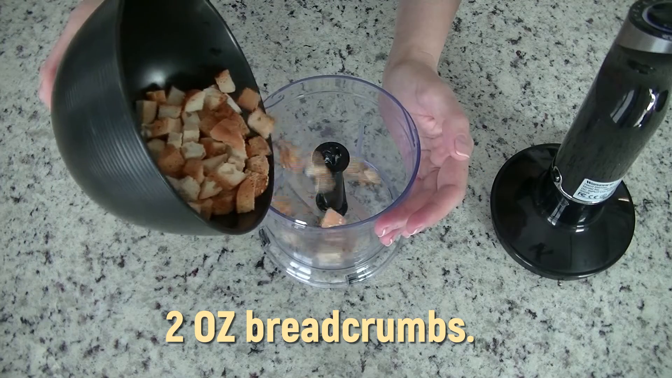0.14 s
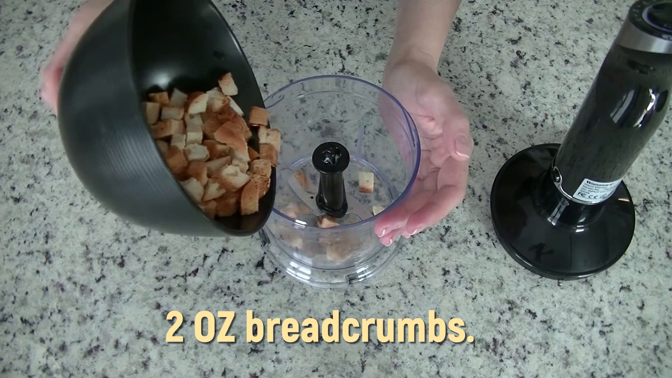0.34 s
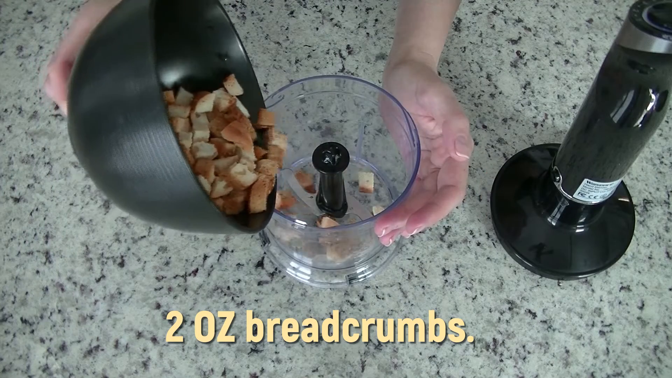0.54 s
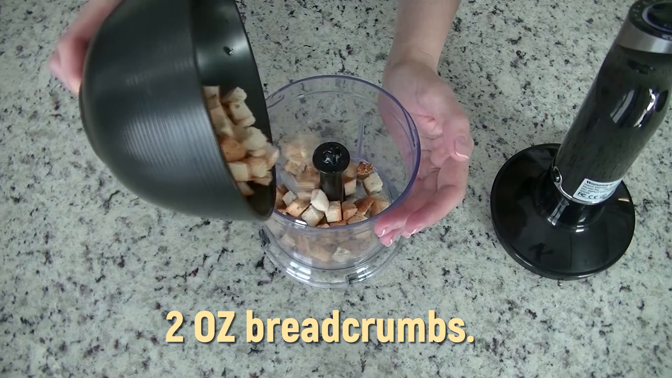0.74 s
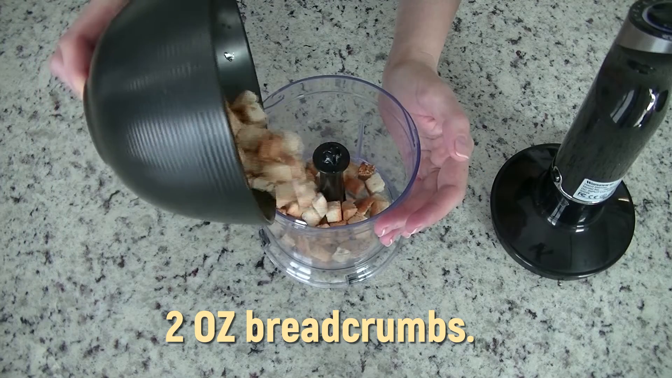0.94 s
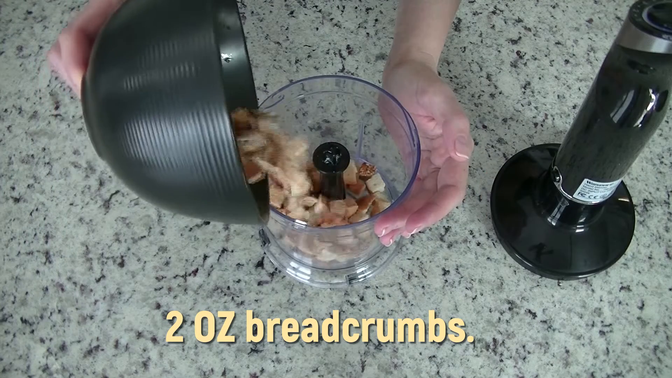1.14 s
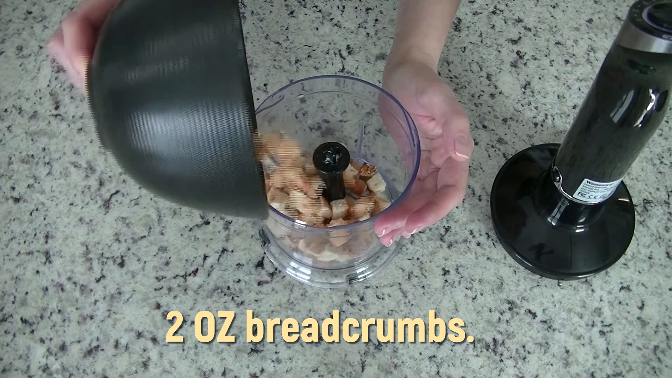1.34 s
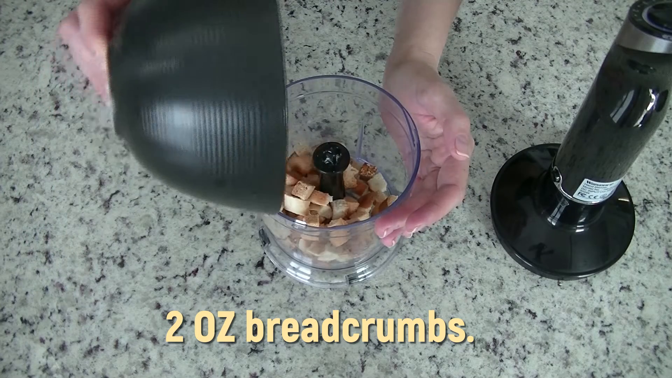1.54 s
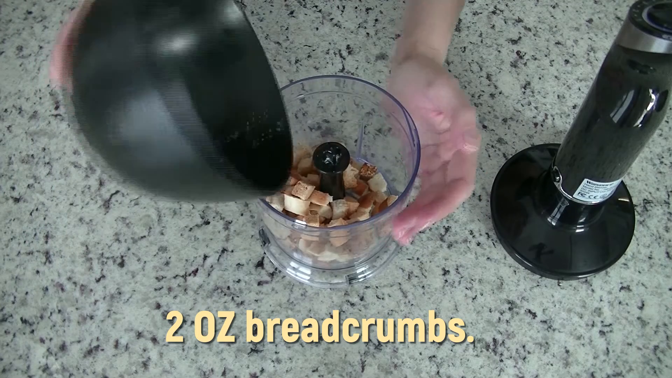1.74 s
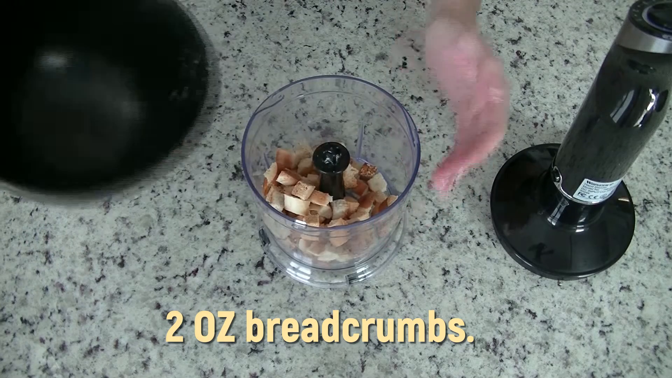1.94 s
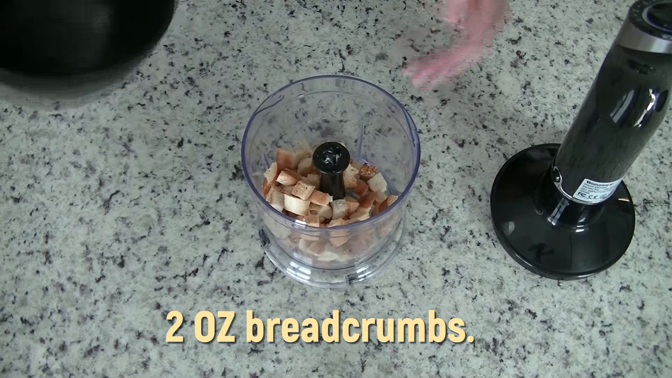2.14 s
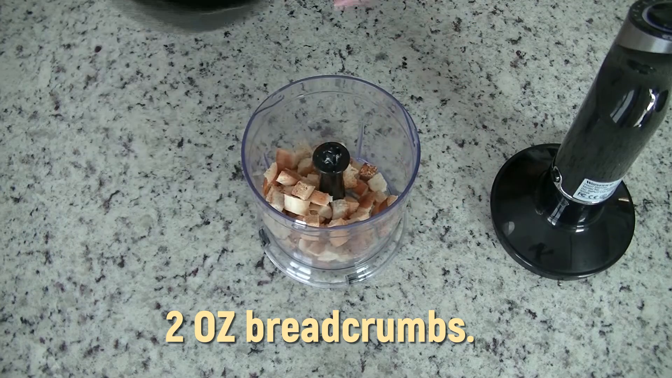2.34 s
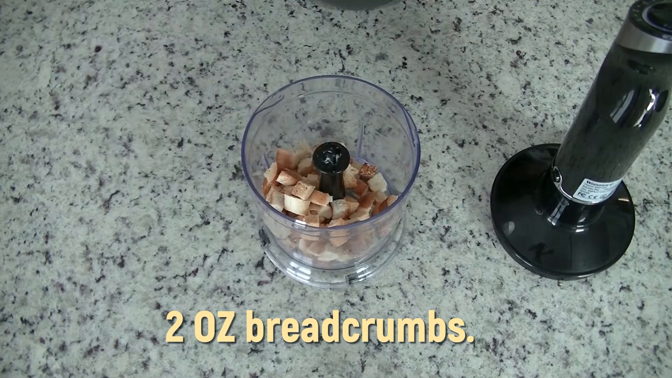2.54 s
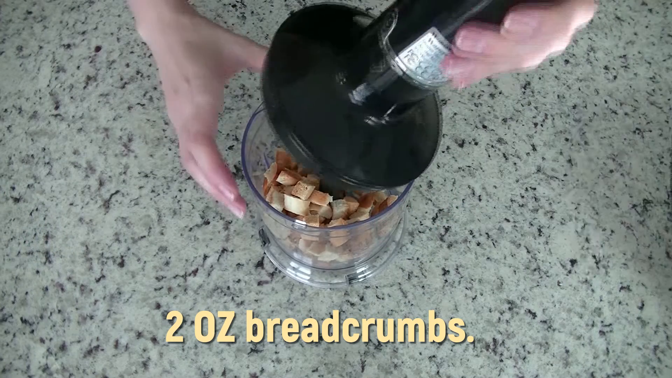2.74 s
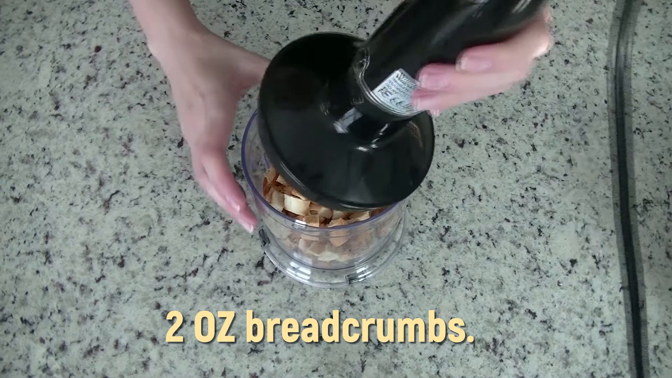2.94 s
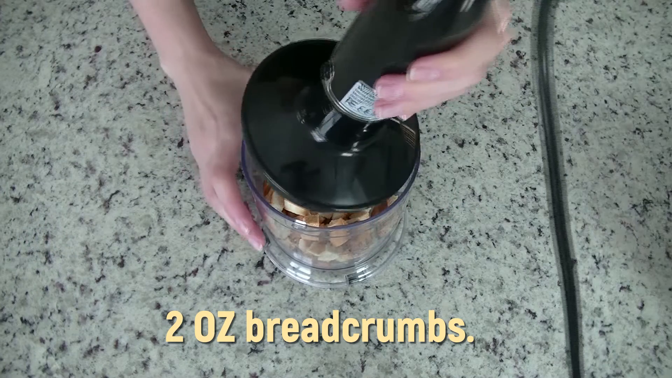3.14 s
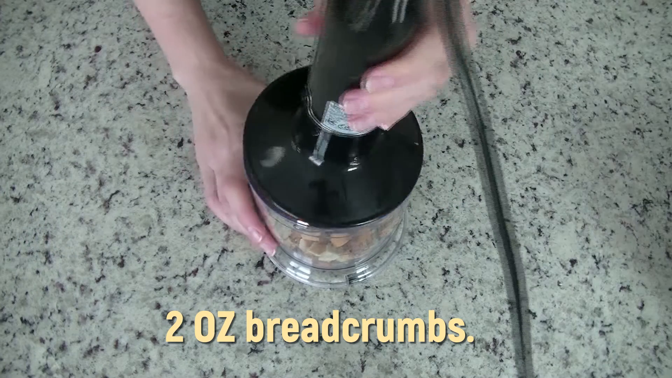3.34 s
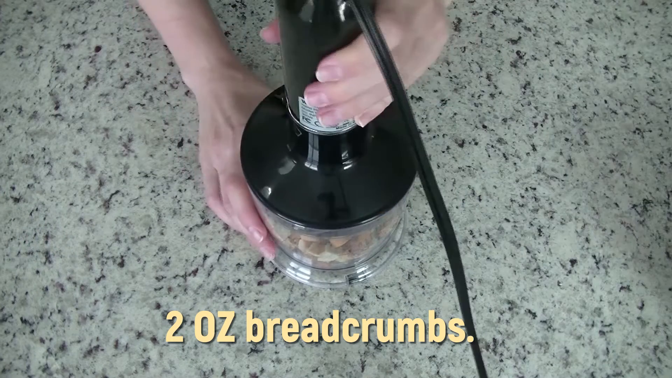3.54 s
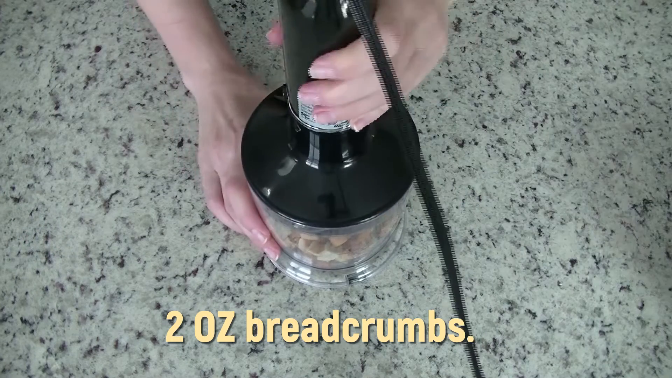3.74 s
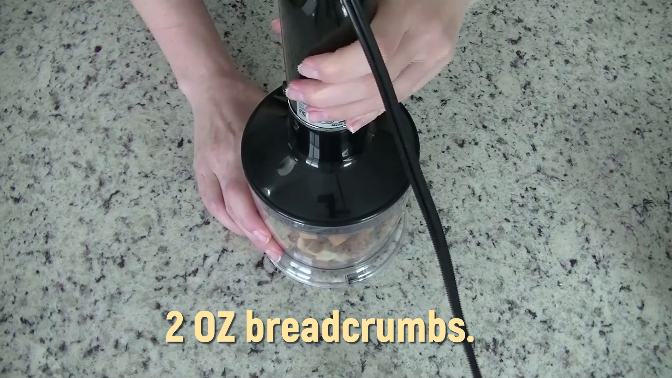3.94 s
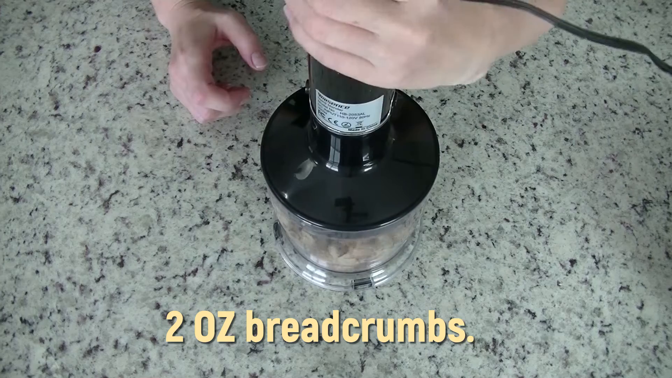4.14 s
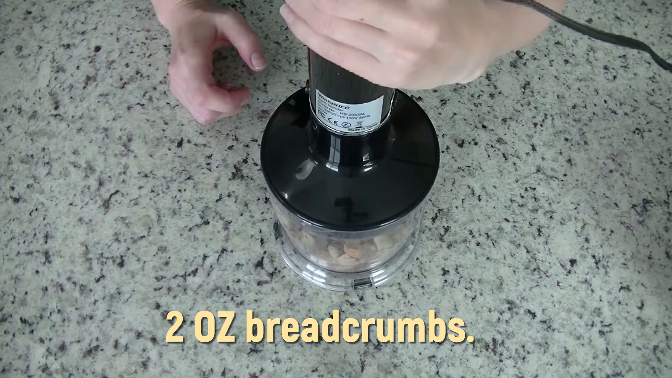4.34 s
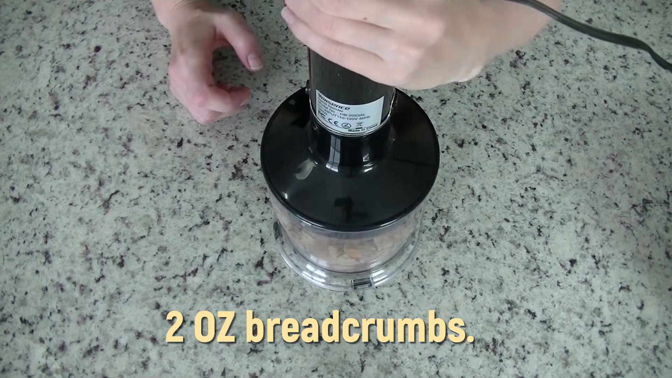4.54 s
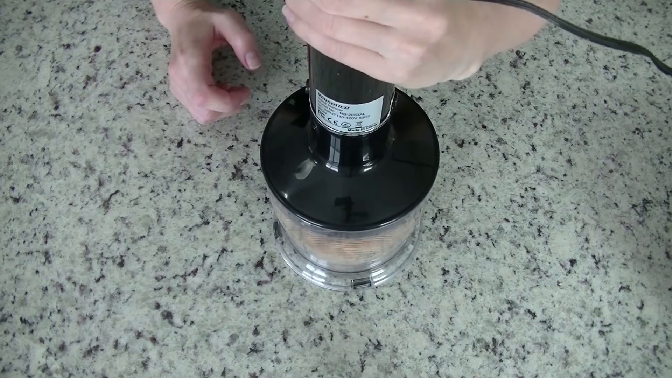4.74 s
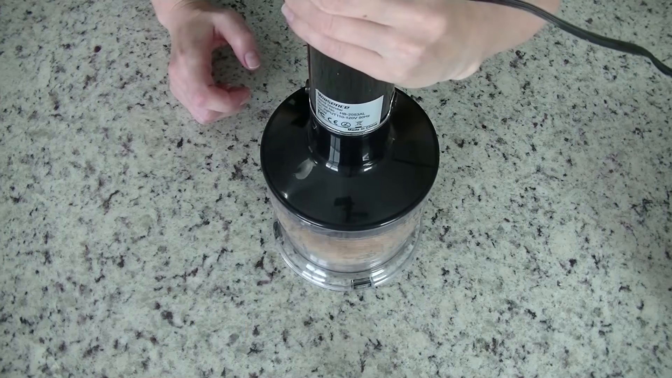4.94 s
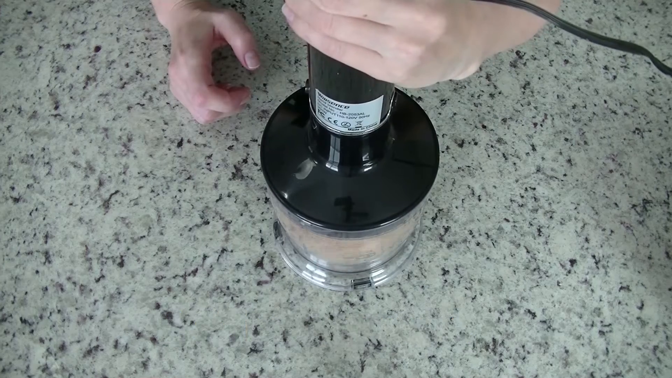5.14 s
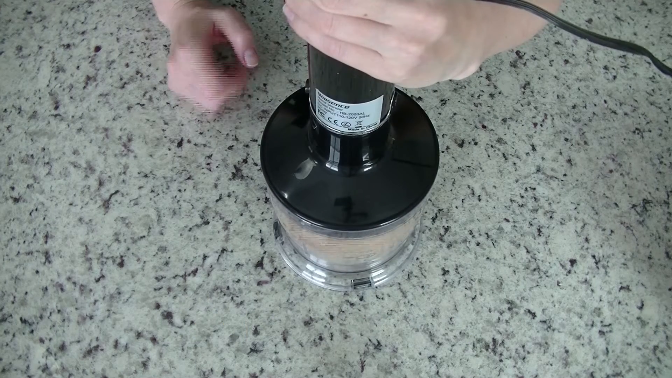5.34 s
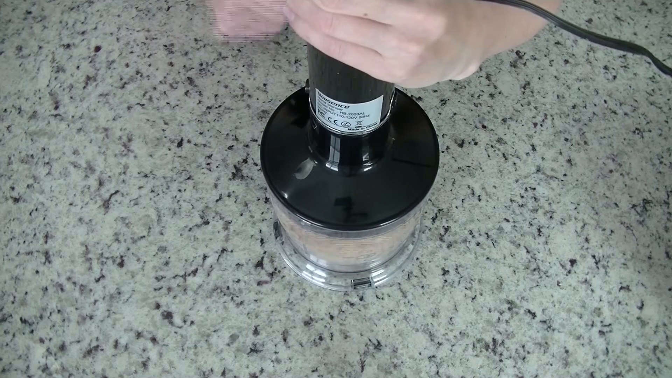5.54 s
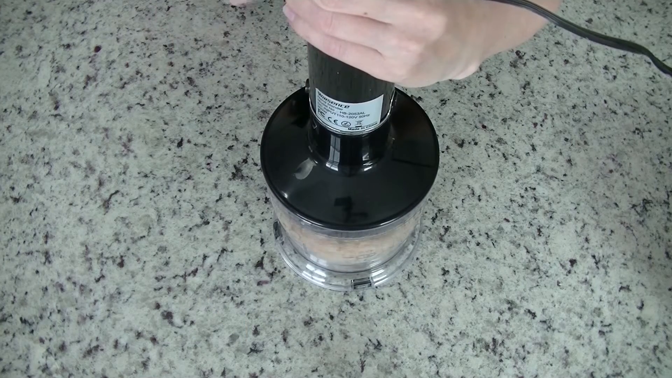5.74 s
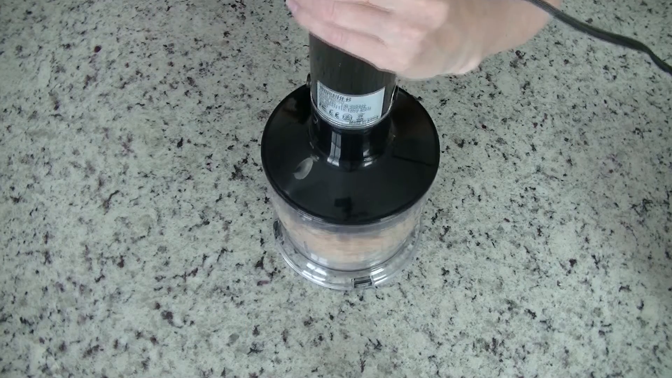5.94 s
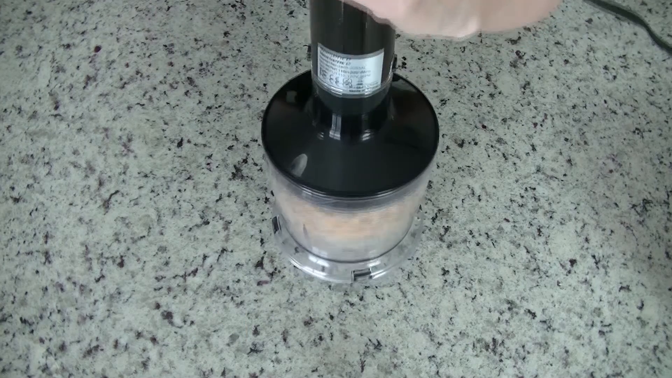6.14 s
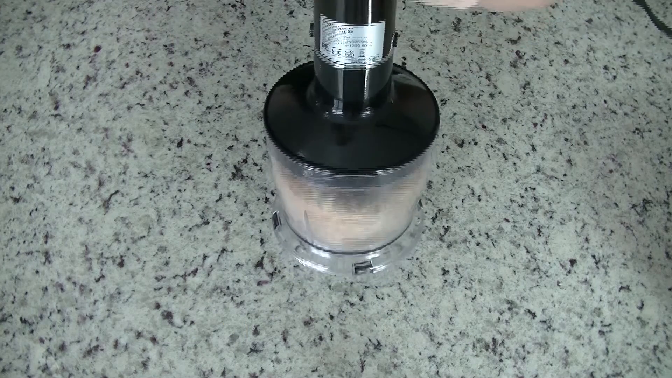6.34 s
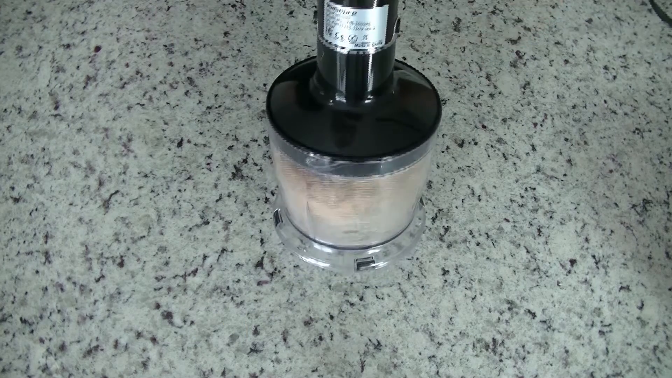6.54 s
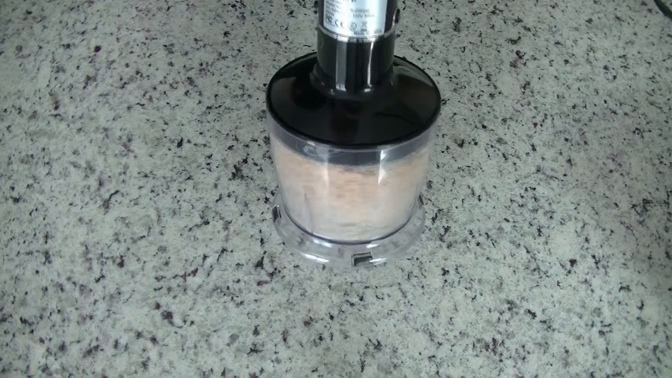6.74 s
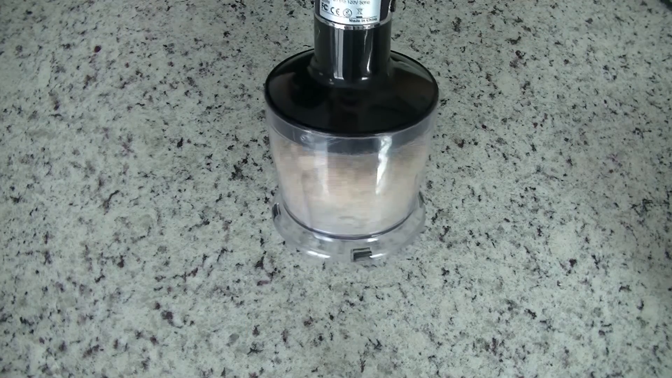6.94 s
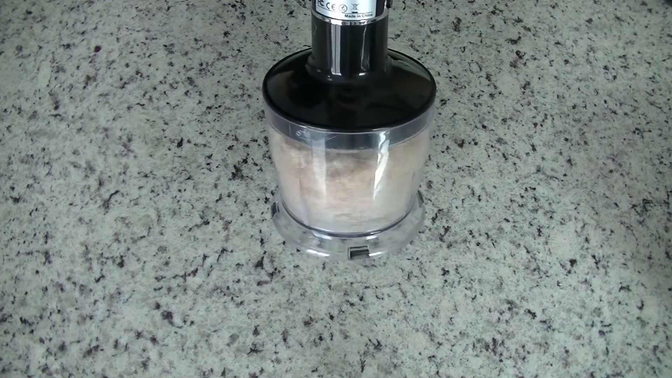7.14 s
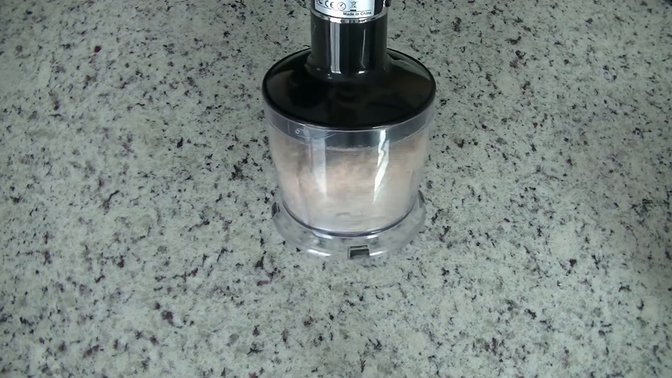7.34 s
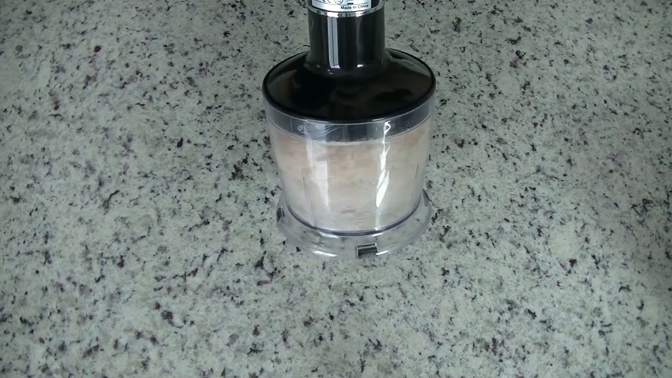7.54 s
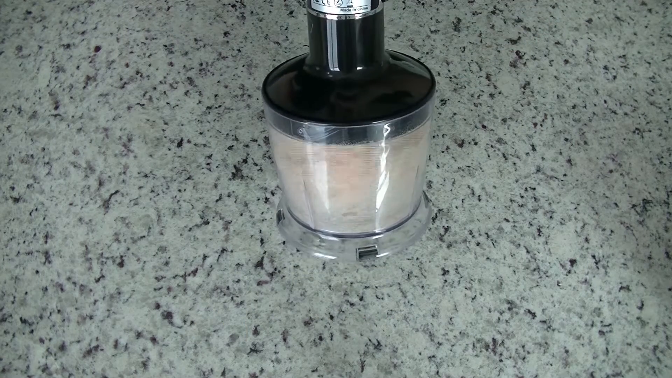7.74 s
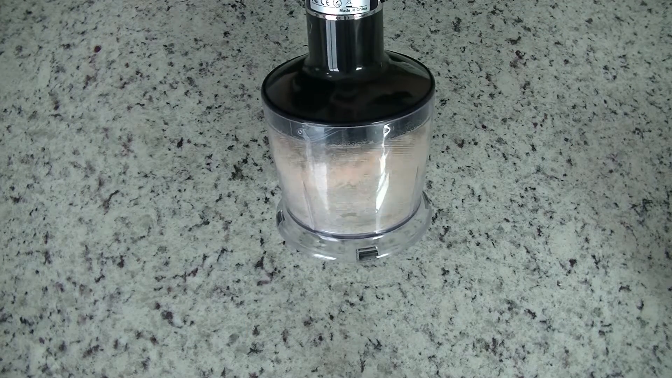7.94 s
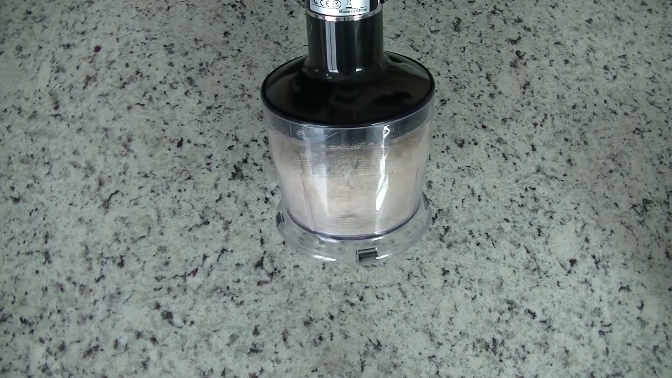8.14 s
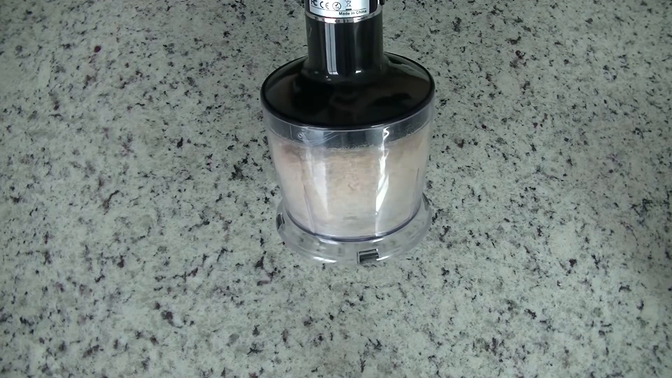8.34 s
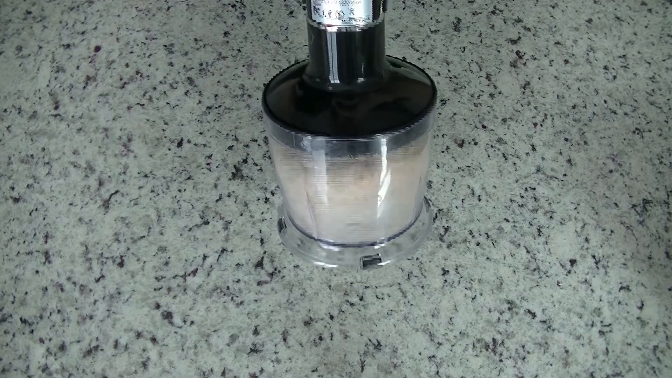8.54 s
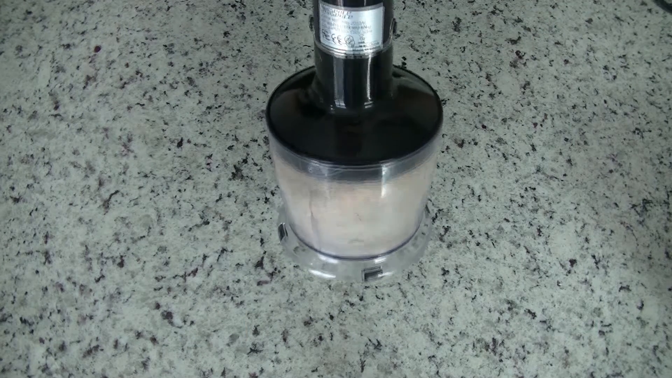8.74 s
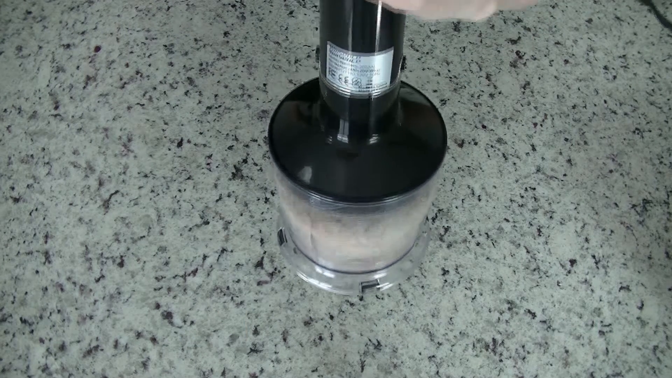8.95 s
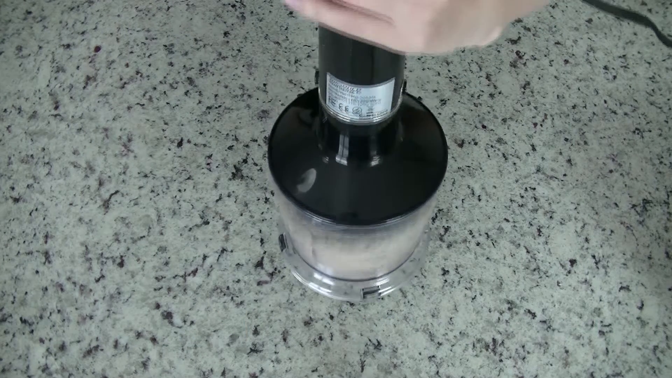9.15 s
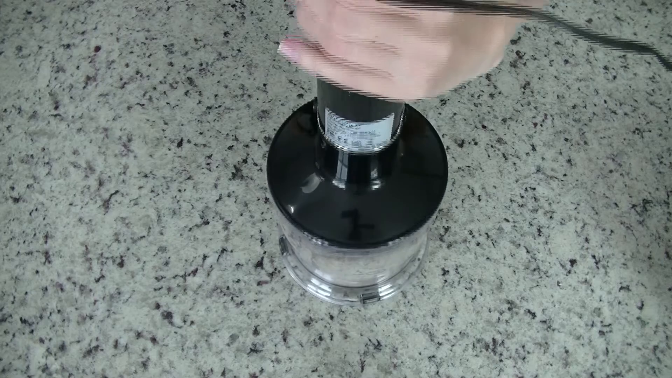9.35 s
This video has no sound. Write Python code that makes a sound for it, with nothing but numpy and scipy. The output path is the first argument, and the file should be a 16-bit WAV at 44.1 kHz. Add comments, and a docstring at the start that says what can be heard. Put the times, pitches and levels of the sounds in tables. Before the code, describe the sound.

Crisp cubes tumble in surges into hard plastic, knocks of a lid follow, and a whirling blade grinds them coarse to fine.

```python
"""A mini chopper's blade flings dry bread cubes round a plastic jar on a stone kitchen counter, two microphones close by.
Random crumbling bursts sound through jar resonances, swelling slightly with each turn, from coarse to hissing crumbs.
Before that the cubes are tipped from a bowl in surges of collisions; lid and motor knock into place as short
ringing bursts, and the cubes give one short rattle. Drive hum, ticks of the camera's focus motor, counter bumps
and steady air noise lie underneath; sparse decaying echoes make the hard kitchen."""
import sys
import numpy as np
from scipy import signal
from scipy.io import wavfile
from scipy.ndimage import uniform_filter1d, minimum_filter1d

SR = 44100
rng = np.random.default_rng(int(sys.argv[2]) if len(sys.argv) > 2 else 0)


def generate_wav(signal):
    """Clip the signal to [-1, 1] and save it as 16-bit WAV at the path in sys.argv[1]."""
    frames = np.transpose(np.atleast_2d(signal))
    scaled = np.clip(frames, -1, 1) * 32767
    pcm = np.round(scaled).astype(np.int16)
    wavfile.write(sys.argv[1], SR, pcm)


N = 414981
TAPS = 4096  # length of a body's response, samples
T, HZ = np.arange(N) / SR, np.fft.rfftfreq(TAPS, 1 / SR)
START_S = 4.612  # the blade starts

# colour of the jar with its floor covered: frequency_hz, level_db
FILLED_JAR = [(71, -63), (120, -34), (569, -17.5), (1050, -24.5), (1370, -20.5), (2480, 0), (3980, 2),
              (7050, -15), (9990, -12), (13900, -24), (16000, -39.5)]


def amp(db):
    """Decibels to gain."""
    return 10 ** (np.asarray(db) / 20)


def evened(x):
    """Scaled to rms 1."""
    return x / np.sqrt(np.mean(x ** 2) + 1e-20)


def read(points, hz=HZ):
    """A spectrum table interpolated on a log-frequency axis."""
    f, value = np.transpose(points)
    return np.interp(np.log(hz + 1), np.log(f + 1), value)


def add(mix, s, sound):
    """Mixes a sound in at time s."""
    part = mix[max(round(s * SR), 0):][:len(sound)]
    part += sound[:len(part)]


def through(x, response):
    """Convolution, cut to the length of x."""
    return signal.oaconvolve(x, response)[:len(x)]


def wander(size):
    """Slow chance of rms 1 that changes over about size samples."""
    smooth = uniform_filter1d(rng.standard_normal(N), size)
    return evened(uniform_filter1d(smooth, size))


def steadied(x, size=3000):
    """Takes the slow swings out of a rattle and leaves its grain."""
    return x / np.sqrt(np.abs(uniform_filter1d(x ** 2, size)) + 1e-9)


def body(colour, modes):
    """Gain in dB of a broad colour with resonances standing on it."""
    return read(colour) + sum(db / (1 + (2 * (HZ - hz) / width) ** 2) for hz, width, db in modes)


def causal(db):
    """The minimum-phase impulse response of a gain in dB: sharp onset, ringing afterwards."""
    log_gain = np.log(amp(np.maximum(db, db.max() - 100)))
    both_sides = np.r_[log_gain, log_gain[-2:0:-1]]
    return np.fft.ifft(np.exp(np.conj(signal.hilbert(both_sides)))).real


def band(hz, width_hz):
    """The response of one steep-sided resonance."""
    return causal(-20 * np.log10(1 + (2 * (HZ - hz) / width_hz) ** 2))


def registers(db):
    """A body's thud, knock, clack and crack: four bands of its response, each of energy 1."""
    # borders between the registers: frequency_hz
    edges_hz = (700, 1900, 6000)
    below = [1 / (1 + (HZ / hz) ** 14) for hz in edges_hz]
    shares = [upper * (1 - lower) for lower, upper in zip([0] + below, below + [1])]
    parts = [causal(db + 10 * np.log10(share + 1e-12)) for share in shares]
    return [p / np.linalg.norm(p) for p in parts]


def rattle(per_s, spread_db, own_db, crumble_s, bed, count):
    """Random collisions as decaying noise bursts; the same ones drive every register, in varying shares."""
    at = np.flatnonzero(rng.random(N) < per_s / SR)
    size_db = spread_db * np.clip(rng.standard_normal(N)[at], -2, 2)
    fade = np.exp(-2 / (crumble_s * SR))
    drives = []
    for _ in range(count):
        power = np.zeros(N)
        power[at] = amp(size_db + own_db * rng.uniform(-0.18, 1, N)[at]) ** 2
        power = signal.lfilter([1], [1, -fade], power)
        level = np.sqrt(power / power.mean() + abs(bed))  # bed: steady noise between collisions
        drives.append(level * rng.standard_normal(N))
    return drives


def patchy(x, depth_db, size):
    """Every fragment has its own pitches: random peaks in the spectrum that last a few milliseconds."""
    z = signal.stft(x, nperseg=size)[2]
    patches = uniform_filter1d(rng.standard_normal(z.shape), size=4, axis=0)
    patches = evened(uniform_filter1d(patches, size=2, axis=1))
    return signal.istft(z * amp(depth_db * np.clip(patches, -2, 2)), nperseg=size)[1][:len(x)]


def morph(drives, gains, stages, weights):
    """Rattles sound the registers of a body whose colour passes through several stages."""
    out = 0
    for k, (drive, gain) in enumerate(zip(drives, gains)):
        blend = sum(w * through(drive, stage[k]) for w, stage in zip(weights, stages))
        out = out + gain * steadied(blend)
    return out


def blows(rows, response, crumble_s, snap, vary_db, gains_db):
    """Single hits: a snap and a crumbling burst of random colour sound a body's registers; treble ends first."""
    # relative lengths of a hit's parts: thud, knock, clack, crack [factors of crumble_s]
    crumble_shares = (1.7, 0.99, 1, 0.64)
    out = np.zeros(N)
    ages = [T[:TAPS] / (crumble_s * abs(share)) for share in crumble_shares]
    fades = [(1 + u) * np.exp(-u) for u in ages]
    for s, *levels_db in rows:
        burst = rng.standard_normal(TAPS)
        burst[0] += snap
        colour = causal(vary_db * evened(uniform_filter1d(rng.standard_normal(len(HZ)), size=60)))
        hit = sum(amp(db + g) * evened(through(through(burst * fade, colour), r))
                  for db, g, r, fade in zip(levels_db, gains_db, response, fades))
        add(out, s, hit)
    return out


def struck(hits, modes):
    """Taps (s, dB) on an object: each mode (Hz, dB, t60 s) is a decaying sine of random phase."""
    out, t = np.zeros(N), T[:SR // 2]
    for s, db in hits:
        ring = sum(amp(db + mode_db - 60 * t / t60) * np.sin(2 * np.pi * (hz * t + rng.random()))
                   for hz, mode_db, t60 in modes)
        add(out, s, ring * np.clip(t / 0.00054, 0, 1))
    return out


def room_air():
    """Steady noise of the room, coloured, with two faint resonances; one noise for mid, another for side."""
    # colour of the air: frequency_hz, level_db
    air_colour = [(12, -44.5), (20, -19.5), (53, -11), (123, -8.5), (158, -3.5), (248, -8.5), (277, -6.5),
                  (422, -9), (459, -10), (780, -12), (1480, -17), (6180, -19), (7310, -17), (8650, -24),
                  (16000, -32.5)]
    # its resonances: frequency_hz, width_hz, lift_db
    air_modes = [(135, 25, 1.7), (7300, 830, 2.6)]
    response = causal(body(air_colour, air_modes))
    return [amp(-58) * evened(through(n, response)) for n in rng.standard_normal((2, N))]


def scatter(seconds):
    """Sparse echoes of random sign."""
    n = int(seconds * SR)
    return rng.choice([-1., 1.], n) * (rng.random(n) < .15)


def tail(x):
    """One path through the room: scattered echoes, each band dying at its own speed."""
    # reverberation of the kitchen: frequency_hz, t60_s
    decay = [(100, 0.24), (300, 0.67), (1000, 0.64), (2500, 0.63), (5000, 0.55), (9000, 0.31),
             (15000, 0.18)]
    hz, t, z = signal.stft(scatter(1) * np.clip(T[:SR] / 0.0049, 0, 1), SR, nperseg=256)
    echoes = signal.istft(z * amp(-60 * t / read(decay, hz)[:, None]), SR, nperseg=256)[1]
    return through(x, echoes / np.linalg.norm(echoes))


def kitchen(x, count=3):
    """The sound feeds several scattered-echo paths in turn, swinging steadily from one to the next."""
    tint = [(100, 0), (300, 2), (600, 1.0), (1000, -1), (2500, -1.5), (5000, 1), (10000, -0.5)]  # Hz, dB
    x = through(x, causal(read(tint)))
    paths = [tail(x * np.cos(np.pi * (4 * T + k / count))) for k in range(count)]
    return sum(paths) * np.sqrt(2 / count)


def focus():
    """Faint, evenly spaced ticks of the camera's focus motor, each a pair of short modes."""
    # two runs of steps: start_s, end_s, level_db
    runs = [(1.971, 2.43, -50), (3.432, 3.89, -50)]
    # ring of one tick: frequency_hz, level_db, t60_s
    tick_modes = [(940, 0, 0.034), (5660, -2.5, 0.053)]
    step_s = .04
    ticks = [(s, db) for start, end, db in runs for s in np.arange(start, end, step_s)]
    return struck(ticks, tick_modes)


def bumps():
    """The jar bumps on the counter: low modes that die quickly."""
    # the bumps: start_s, level_db
    bump_hits = [(3.5, -52.5), (4.606, -56), (7.555, -61)]
    # low modes of a bump: frequency_hz, level_db, t60_s
    bump_modes = [(45, 0, .2), (75, 2, .15), (127, 16, .15)]
    return struck(bump_hits, bump_modes)


def bowl():
    """Some cubes ring the tilted bowl: taps on its modes."""
    # the taps: start_s, level_db
    taps = [(.638, -37), (.675, -41), (.713, -23), (1.01, -25.5), (1.052, -30)]
    # ring of the bowl: frequency_hz, level_db, t60_s
    bowl_modes = [(1740, -2.5, 0.13), (2260, -18, 0.38), (3080, 0.5, 0.11), (3070, -22, 0.63),
                  (4820, -8.5, 0.11), (6700, -12, 0.1), (8866, -14, 0.15)]
    return struck(taps, bowl_modes)


def lid():
    """Plastic knocks on plastic and the lid rings briefly; then the cubes are jolted once and settle."""
    # lid, motor and switch knock into place: start_s, level_db, thud_relative_db, bright_edge_relative_db
    knock_rows = [(3.334, -29.5, -14, 2), (3.3418, -14, -15, -10), (3.468, -17, -21, -23),
                  (3.486, -28, -13, -13), (3.496, -22.5, -6, -10), (3.516, -27.5, -9, -8.5),
                  (3.576, -27.5, -16, -23), (3.653, -30, -14, -26), (3.689, -33.5, -15, -18),
                  (3.752, -37, -17, 1), (3.8, -27.5, -8.5, -10.5), (3.836, -49, -4, -12),
                  (3.9081, -2.5, -18, -15), (4.386, -38, -20, 6), (4.532, -51, -14, 5),
                  (4.6045, -21, -6.5, -7)]
    # colour of the lid: frequency_hz, level_db
    lid_colour = [(40, -36), (110, -14.5), (250, 1), (450, -1.5), (800, -10.5), (1050, -2), (1450, -16),
                  (2400, -13), (4000, -16.5), (7000, -34), (11000, -31), (16000, -54)]
    # its broad resonances: frequency_hz, width_hz, lift_db
    lid_modes = [(335, 96, -1.5), (1720, 160, 6.5), (2390, 110, 6), (3250, 550, 5.5)]
    # the lid's own ring: frequency_hz, level_db, t60_s
    lid_ring = [(1018, 1.5, 0.058), (1164, 3, 0.028), (810, -29, 0.03)]
    # colour of the jolted cubes: frequency_hz, level_db
    shaken = [(59, -103), (100, -37.5), (234, -15), (350, -11), (502, -17), (558, -14), (1010, -6.5),
              (1610, -12.5), (2270, 0.5), (2750, -6.5), (3470, -1), (8280, -16.5), (10000, -15.5),
              (14700, -33), (16000, -64)]
    hits = [(s, db + thud_db, db, db + edge_db, db + edge_db) for s, db, thud_db, edge_db in knock_rows]
    knocks = blows(hits, registers(body(lid_colour, lid_modes)), crumble_s=0.002, snap=5.3, vary_db=1.2,
                   gains_db=(-11, -22, -12.5, -22.0))
    ring = struck([(s, db - 8) for s, db, *_ in knock_rows], lid_ring)

    shake_s, jolt_db, jolt_s = 4.132, -26, 0.016  # the jolt; level and decay of its first clash
    drive, = rattle(per_s=2900, spread_db=-2, own_db=3, crumble_s=0.0033, bed=.15, count=1)
    age = np.maximum(T - shake_s, 0)
    settle = (amp(-20.0 - 99 * age) + amp(jolt_db) * np.exp(-age / jolt_s)) * (T > shake_s)
    cubes = through(drive, causal(body(shaken, [(2320, 240, 4.5), (3470, 110, 1.7)])))
    return knocks + ring + settle * steadied(cubes)


def pour():
    """Cubes tumble in surges into the jar, whose ring is muffled as its floor gets covered; crumbs tick along."""
    # single cubes landing: start_s, level_db, low_body_relative_db, crisp_treble_relative_db
    cubes = [(.016, -12.5, -20, -13.5), (0.0436, -3, -24, -22), (.0654, -5.5, -22, -18.5),
             (0.1035, -7.5, -13, -15), (0.1138, -6, -22, -21), (.122, -7.5, -14, -22),
             (.1468, -2, -19, -21), (.1693, -9, -14, -1.5), (.185, -4, -25, -16), (0.2051, -3, -29, -18),
             (.229, -5, -31, -21), (0.254, -17, -21, -9), (0.2948, -14.5, -8, 1), (.307, -12, -16.5, -10),
             (.32, -5.5, -26, -22), (.444, -16, -11, -25), (.4648, -6, -31, -29), (.583, -27, -13, -32),
             (.6164, -25.5, -13, -34), (.829, -24, -5, -6), (.8449, -11.5, -15, -16), (.874, -17, -24, -31),
             (0.9344, -13.5, -25, -10.5), (0.9686, -10.5, -35, -40), (1.0202, -26, 1, -9),
             (1.074, -24.5, 0, 0), (1.0942, -12.5, -18, -7), (1.1245, -12, -10.5, -11),
             (1.1704, -11.5, -13, -16), (1.203, -12.5, -32, -37), (1.2357, -9, -23, -26),
             (1.312, -13, -6, -1), (1.332, -7, -45, -23), (1.436, -8, -33, -14), (1.531, -28, -6, -3),
             (1.559, -23, -17, -11), (1.6637, -34, -12, -24), (1.7246, -32, -11, -27),
             (1.768, -19, -32, -23), (1.92, -40, -14, -24)]
    # each tip of the bowl: full_flow_from_s, until_s, level_db, crisp_treble_relative_db, low_body_relative_db
    surges = [(.1, 0.265, -19.5, -9, -10.5), (0.846, 0.907, -30, -14, -6.5),
              (1.127, 1.404, -22.5, -9.5, -8.5)]
    # colour of the empty jar: frequency_hz, level_db
    empty_jar = [(71, -78), (120, -48.5), (684, -18), (930, -21), (1550, -12), (2590, -0.5), (3380, -2.5),
                 (5630, -12.5), (9990, -13), (16000, -29)]
    # resonances of the empty jar: frequency_hz, width_hz, lift_db
    empty_modes = [(700, 42, 3.6), (1050, 120, 5.6), (1620, 200, 5.1), (1970, 39, 5.9), (2345, 170, 7.1),
                   (3440, 230, 16), (3700, 160, 2.7), (4650, 160, 10), (6300, 150, 1.8), (9780, 600, 8)]
    # resonances of the covered jar: frequency_hz, width_hz, lift_db
    filled_modes = [(634, 370, 6.2), (1053, 71, 12), (2010, 54, 1.8), (2410, 250, 8.3), (3120, 130, 3),
                    (3360, 120, 3.7), (3840, 83, 2), (5760, 270, 3.3), (9100, 800, 2.5)]
    rise_db_per_s, fall_db_per_s = 87.5, 100
    trickle_db, last_cube_s = -52, 2  # stragglers slide between and after the surges
    flows = [amp(db - rise_db_per_s * np.maximum(start - T, 0) - fall_db_per_s * np.maximum(T - end, 0))
             for start, end, db, *_ in surges]
    trickle = amp(trickle_db) * np.interp(T, [1.55, last_cube_s], [1, 0])
    crisp = sum(flow * amp(row[3]) for flow, row in zip(flows, surges)) + trickle * amp(-17.5)
    low = sum(flow * amp(row[4]) for flow, row in zip(flows, surges)) + trickle * amp(-2)

    empty, filled = registers(body(empty_jar, empty_modes)), registers(body(FILLED_JAR, filled_modes))
    cover = np.interp(T, [.5, .8], [0, 1])
    drives = rattle(per_s=420, spread_db=-0.5, own_db=2, crumble_s=0.0012, bed=0.12, count=4)
    drives = [patchy(d, depth_db=4.5, size=256) for d in drives]
    gains = [low * amp(-16), low * amp(-3), (sum(flows) + trickle) * amp(-7.5), crisp * amp(-9.5)]
    tumble = morph(drives, gains, [empty, filled], [1 - cover, cover])

    crumbs, = rattle(per_s=110, spread_db=-0.5, own_db=-4.5, crumble_s=.0006, bed=0.0029, count=1)
    ticks = steadied(through(crumbs, band(hz=9500, width_hz=2900)), size=8000)
    tumble += ticks * amp(-25) * sum(flows) ** 0.95  # crumbs slide before and after the cubes

    hits = [(s, db + low_db, db + low_db, db, db + crisp_db) for s, db, low_db, crisp_db in cubes]
    for covered, jar in [(False, empty), (True, filled)]:
        landing = [hit for hit in hits if (hit[0] > .5) == covered]
        tumble = tumble + blows(landing, jar, crumble_s=0.0021, snap=6, vary_db=3.5,
                                gains_db=(-28, -13, -21.5, -14.5))
    return tumble


def blade():
    """The blade's turns so far, and how far it has coasted down (0 while driven)."""
    turns_per_s, waver = 48.3, .012  # driven speed; its relative unsteadiness
    stop_s, coast_s, slowing = 8.913, .5, 0.28  # switched off; over coast_s it loses this share of speed
    coast = (np.maximum(T - stop_s, 0) / coast_s) ** 2
    speed = turns_per_s * (1 - slowing * np.minimum(coast, 1)) * (1 + waver * wander(size=1200))
    return np.cumsum(speed * (T > START_S)) / SR, coast


def hum(turns):
    """The drive hums through the jar: a sine at four times the blade's speed."""
    # level under load, before a fixed trim and fades: time_s, level_db
    load = [(6.2, -47), (7.11, -55), (7.2, -42), (7.35, -57), (7.7, -42), (7.81, -74), (7.9, -46.5),
            (8.8, -43), (9.1, -63)]
    level_db = np.interp(T, *np.transpose(load))
    tone = evened(np.sin(8 * np.pi * turns))
    return amp(level_db - 1.5) * tone * np.interp(T, [6.1, 7.1, 8.9, 9.1], [0, 1, 1, 0])


def strikes(turns, level_db, jar):
    """Hard pieces meet the blade: the loudest at set times, lesser ones by chance as it comes round."""
    # the hardest pieces, hit squarely: start_s, level_db, crisp_treble_relative_db
    hard_rows = [(4.612, 3.5, -7.5), (4.9716, -13, -8), (5.1976, -17, -11), (5.2649, -10, -27),
                 (5.412, -10, -13), (5.528, 0.5, -33), (5.6161, -20, -19), (5.688, -22, 7),
                 (5.7077, -20, -19), (5.7249, -2, -25), (6.021, -8, -18), (6.0413, -2, -21),
                 (6.2467, -2, -7), (6.309, -1.5, -11), (6.3753, -5, -21), (6.6358, -11, -6),
                 (6.6944, -6, -8), (6.727, -5, -10), (6.9, -2.5, -6), (7.2847, -5.5, -7),
                 (7.3601, 0.5, -26), (7.7092, -4.5, -1.5), (7.908, -8, -18), (7.9518, -5, -3),
                 (7.9991, -10, -19), (8.5484, -10.5, -5), (8.5809, -14, -1), (8.6974, -8, -24),
                 (8.7409, -8, -5), (8.954, -8, -20), (9.0377, -7.5, -15), (9.2506, -11, -20)]
    stray_chance, stray_db, spread_db = .45, -3, 4.5  # per turn; level over the crunch; scatter
    passes = np.flatnonzero(np.diff(np.floor(turns)) > 0)
    luck = rng.random(size=300)
    own = np.clip(rng.standard_normal(size=(300, 4)), -1.5, 1.5)
    strays = [(T[at], *(level_db[at] + stray_db + spread_db * o))
              for at, u, o in zip(passes, luck, own) if u < stray_chance]
    hard = [(s, db, db, db, db + crisp_db) for s, db, crisp_db in hard_rows]
    return (blows(hard, jar, crumble_s=0.001, snap=.74, vary_db=4.0, gains_db=(-43, -31, -22.0, -18.5))
            + blows(strays, jar, crumble_s=0.002, snap=0.95, vary_db=4, gains_db=(-25, -12, -12.5, -15)))


def chop(turns, coast):
    """Pieces flung by the blade hit the wall at random, with a faint throb at each turn; coarse turns to fine."""
    # colour of whole cubes in the shut jar: frequency_hz, level_db
    coarse = [(59, -50), (100, -45), (335, -13.5), (481, -13), (634, -18.5), (854, -13.5), (1130, -13.5),
              (1870, -11.5), (2320, -13), (2690, -9.5), (3620, -4.5), (7140, -19), (10000, -14),
              (14400, -27.5), (16000, -55)]
    # colour of broken pieces: frequency_hz, level_db
    pieces = [(59, -65), (100, -46), (189, -20), (277, -19.5), (570, -17), (634, -23), (854, -8.5),
              (970, -14), (2520, 3.5), (3050, -6.5), (3860, -3.5), (6840, -17.5), (10200, -12.5),
              (13200, -19.5), (16000, -30)]
    # colour of crumbs: frequency_hz, level_db
    fine = [(59, -40), (100, -29), (189, -11.5), (219, -11.5), (570, -10), (634, -12), (872, -6),
            (1080, -7.5), (2520, 7.5), (3250, -1.5), (3860, 6.5), (4200, -1), (6840, -7.5), (11400, -4.5),
            (16000, -21.5)]
    # resonances of the shut jar: frequency_hz, width_hz, lift_db
    shut_modes = [(505, 8.5, 0.54), (718, 27, 3.3), (875, 47, 3.3), (1047, 24, 7.7), (1215.5, 46, 5.3),
                  (1370, 44, 0.67), (2440, 120, 1.1), (2960, 280, 3.2), (3500, 620, 3.8), (3904, 120, 2.7),
                  (4487, 150, 6.7), (4880, 200, 4.9), (5315, 106, 5.1), (6000, 460, 6.8), (8770, 160, 5.6),
                  (9850, 370, 2.9), (11400, 980, 3.2)]
    # resonances of crumbs dropping back: frequency_hz, width_hz, lift_db
    settle_modes = [(2320, 260, 11), (3530, 220, 11), (4730, 220, 12)]
    # pieces caught and dragged along the wall: centre_s, length_s, level_db
    scrapes = [(4.742, 0.054, -23), (6.08, 0.077, -27.5)]
    break_s, grind_s = (5.79, 6.17), (7.33, 7.45)  # cubes break into pieces; pieces become crumbs
    chop_db, soften_db_per_s, coast_db = -20.5, -0.2461, -18  # softer as pieces shrink and as it coasts
    level_db = chop_db + soften_db_per_s * (T - START_S) + coast_db * coast
    stages = [registers(body(colour, shut_modes)) for colour in (coarse, pieces, fine)]
    broken, ground = np.interp(T, break_s, [0, 1]), np.interp(T, grind_s, [0, 1])

    crisp_db = -2.5 * broken - 6 * coast
    low_db = np.interp(T, [START_S, 4.85], [-11, 0])  # cubes need a moment to reach the wall
    low_db = low_db - 2.36 * broken + 0.78 * ground
    low_db = low_db - 8 * coast  # a slowing blade throws more gently
    *drives, knocks = rattle(per_s=400, spread_db=2.0, own_db=10.5, crumble_s=0.0045, bed=0.46, count=5)
    drives = [patchy(d, depth_db=3.5, size=256) for d in drives]
    gains = [amp(low_db - 17.0 + 0.47 * broken), amp(low_db - 4.5),
             amp(-1.5 + 2.3 * broken - 2.9 * coast), amp(crisp_db - 2.0)]
    crunch = morph(drives, gains, stages, [1 - broken, broken - ground, ground])

    # smaller pieces ring the wall higher
    whole = steadied(through(knocks, band(hz=2267, width_hz=320)))
    small = steadied(through(knocks, band(hz=2550, width_hz=480)))
    ring = (1 - broken) * whole * amp(np.interp(T, [START_S, 4.78], [-8, 2.2]))
    ring += broken * small * amp(-9.5 + 7 * coast)
    # crumbs drop back to the floor
    dropping = steadied(through(knocks, causal(body(FILLED_JAR, settle_modes))))
    ring += dropping * amp(2) * np.minimum(coast, 1)
    # crust snaps off in sharp ticks
    chips, = rattle(per_s=60, spread_db=2, own_db=-6, crumble_s=0.0014, bed=.01, count=1)
    crunch += steadied(through(chips, band(hz=9800, width_hz=4600)), size=12000) * amp(crisp_db - 4)

    scrape_level = sum(amp(db) * np.exp(-((T - s) / length) ** 2) for s, length, db in scrapes)
    drag = steadied(through(knocks, band(hz=1406, width_hz=150))) * scrape_level
    # the load is lopsided and keeps shifting
    throb_db = 0.5 * np.cos(2 * np.pi * turns)
    churn_db = (.5 + 1.1 * broken) * wander(size=2200)
    running = np.clip((T - START_S) / 0.0019, 0, 1)
    flung = (crunch + ring) * amp(level_db + throb_db + churn_db - 1.13) * running
    return flung + drag + strikes(turns, level_db, stages[1])


def scene():
    """All sources in the room, heard by two close microphones that differ mostly in the treble."""
    # stereo width of the sources: frequency_hz, side_minus_mid_db
    width = [(60, -27), (110, -1), (200, -62.5), (380, -36), (700, -13), (1290, -12), (2380, -13.5),
             (4400, -5), (8120, 0.5), (15000, -1.5)]
    air_width = [(40, -3), (200, -4.5), (1000, 6.5), (4000, -2.5), (12000, 0.5)]  # Hz, dB
    turns, coast = blade()
    poured, knocked, chopped = pour() + bowl(), lid(), chop(turns, coast)
    send = amp(-7.0) * poured + amp(-6.5) * knocked + amp(-7.5) * chopped
    air, air_side = room_air()
    direct = poured + knocked + chopped + hum(turns) + focus() + bumps()
    mid = direct + kitchen(send) + air

    near = scatter(1)[:TAPS] * np.exp(-T[:TAPS] / 0.0093)  # counter and wall close by
    early = through(direct, near / np.linalg.norm(near))
    side = through(amp(-12.5) * early + amp(-1.5) * tail(send), causal(read(width)))
    side += through(air_side, causal(read(air_width)))
    return np.array([mid + side, mid - side]) * amp([[-.35], [.35]])  # channel balance, dB


def record(dry):
    """A fast limiter holds the sharpest peaks under full scale; then the band limit."""
    allowed = 1 / np.maximum(abs(dry).max(0) / .92, 1)
    gain = uniform_filter1d(minimum_filter1d(allowed, size=61), size=61)
    low_pass = signal.firwin(511, 15900, window=("kaiser", 9), fs=SR)  # cutoff in Hz
    return signal.oaconvolve(dry * gain, low_pass[None], "same")


dry = scene()
out = record(dry)
generate_wav(out)
```